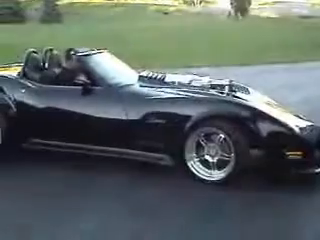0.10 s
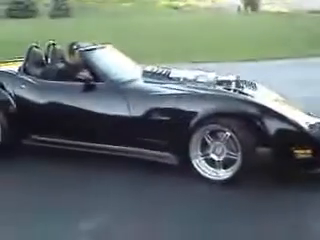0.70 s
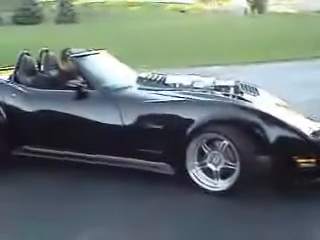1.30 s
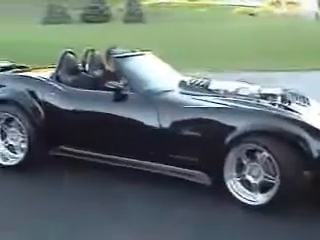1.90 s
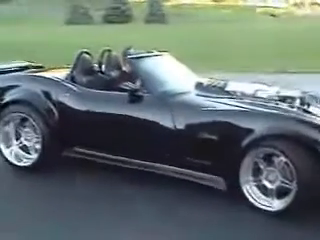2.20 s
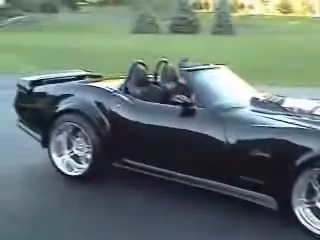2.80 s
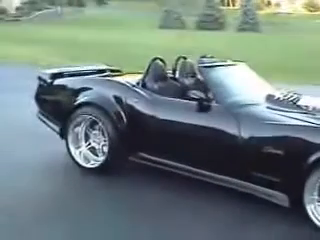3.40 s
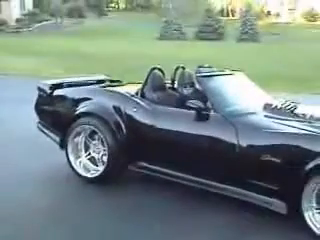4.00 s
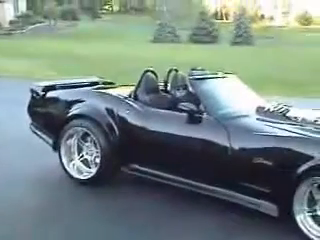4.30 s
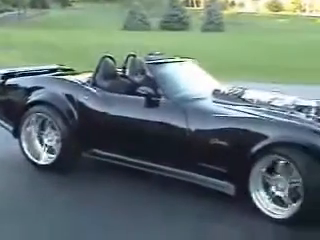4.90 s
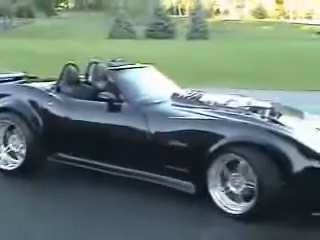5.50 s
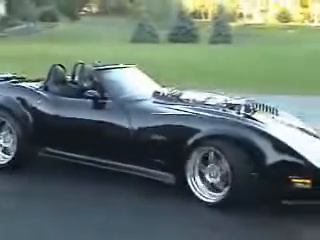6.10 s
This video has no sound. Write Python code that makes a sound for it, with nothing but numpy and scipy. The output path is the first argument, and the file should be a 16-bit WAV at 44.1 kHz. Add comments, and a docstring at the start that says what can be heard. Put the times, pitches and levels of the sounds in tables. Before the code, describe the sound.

A V8 sports car runs close to the microphone in the open air. For the first two seconds it idles with a deep, uneven boom and chuffing exhaust, over a light engine hiss, faint valve ticking and a couple of soft pops. Near 2 seconds the engine drags down slightly. Short revs follow: a strong one at about 2.3 seconds, two lighter ones around 3.4 and 3.8, a sharp one at 4.4, a double push from 4.9 to 5.3, and a last one from 5.8 to 6. With each, the pitch rises, the boom becomes a bark and the exhaust rasps hard, then crackles and stumbles as the speed falls. Pops and misfires come between, the loudest near 4.5 and 5.25 seconds. The intake gives a few very brief, high whistles. Light wind rumbles on the microphone underneath throughout.

```python
"""A V8 sports car idles: uneven firings boom in its side pipes, and each one spits a puff of gas.
The open engine hisses and ticks, and a little wind rumbles on the microphone.
Near two seconds the clutch takes up and drags the engine down. Eight short presses of the pedal
follow: the boom gives way to a bark, the gas turns to a hard rasp, the pipes pop and misfire,
and air whistles briefly through the throttle."""
import sys
import numpy as np
from scipy import signal
from scipy.fft import rfft, irfft, next_fast_len
from scipy.io import wavfile
from scipy.ndimage import uniform_filter1d, map_coordinates

SR = 44100
rng = np.random.default_rng(int(sys.argv[2]) if len(sys.argv) > 2 else 0)


def output_pcm(signal):
    """Save a mono or channel-first signal as 16-bit PCM at the path in sys.argv[1].

    Samples are clipped to [-1, 1] before scaling.
    """
    pcm = np.clip(np.atleast_2d(signal).T, -1, 1) * 32767
    wavfile.write(sys.argv[1], SR, np.round(pcm).astype(np.int16))


N = 274743


def amp(db):
    """Turn decibels into a gain."""
    return 10 ** (np.asarray(db) / 20)


def unit(x):
    """Scale x to an average (rms) level of 1."""
    return x / np.sqrt(np.mean(x ** 2) + 1e-20)


def wobble(rate):
    """A smooth random curve through rate points a second."""
    return map_coordinates(rng.standard_normal(int(N * rate / SR) + 4), [np.arange(N) * rate / SR])


def flutter(rate):
    """A random zigzag through rate points a second."""
    knots = rng.standard_normal(int(N * rate / SR) + 2)
    return np.interp(np.arange(N) * rate / SR, np.arange(len(knots)), knots)


def swell(s, half):
    """A smooth bump of height 1 at time s, lasting about half seconds to each side."""
    out = np.zeros(N)
    near = np.arange(max(int((s - 4 * half) * SR), 0), min(int((s + 4 * half) * SR), N))
    out[near] = np.exp(-((near / SR - s) / half) ** 2)
    return out


def step(s, ease):
    """A smooth rise from 0 to 1 around time s."""
    return .5 + .5 * np.tanh((np.arange(N) / SR - s) / ease)


def lagged(x, seconds):
    """Follow x sluggishly, about this many seconds behind."""
    share = 1 / (seconds * SR)
    return signal.lfilter([share], [1, share - 1], x)


def filtered(x, response):
    """Scale each frequency in x by the gain response(hz)."""
    size = next_fast_len(N + SR // 2)
    return irfft(rfft(x, size) * response(np.fft.rfftfreq(size, 1 / SR)), size)[:N]


def ring(x, spectrum):
    """Let x ring in a body whose tone is given as (Hz, dB) points."""
    size = 16384
    hz, db = np.transpose(spectrum)
    curve_db = np.interp(np.log(np.fft.rfftfreq(size, 1 / SR) + 1), np.log(hz + 1), db)
    cepstrum = irfft(np.log(amp(curve_db)))
    # fold it so that the ringing comes after each hit, never before
    cepstrum[1:size // 2] *= 2
    cepstrum[size // 2 + 1:] = 0
    return signal.fftconvolve(x, irfft(np.exp(rfft(cepstrum))))[:N]


def steady(x, span, swing=0):
    """Even out the level of x over span seconds, keeping the share swing of its changes in dB."""
    size = int(span * SR)
    power = np.abs(uniform_filter1d(uniform_filter1d(unit(x) ** 2, size), size)) + 1e-12
    return unit(x) / power ** ((1 - swing) / 2)


def effort(engine, idle_db, throttle_db, doubling_db):
    """A level in dB: idle_db, plus throttle_db at full throttle and doubling_db per doubling of speed."""
    return idle_db + throttle_db * engine["throttle"] + doubling_db * np.log2(engine["speed"] / IDLE_HZ)


# The tone of the wind. Each row: frequency in Hz, level in dB.
WIND_TONE = [(8, -9), (20, -8), (45, -6.5), (70, -2.5), (150, -21), (400, -83)]
# Gusts. Each row: time in seconds, dB above the breeze.
GUSTS = [(1.79, 13), (3.43, 8), (4.48, 6), (4.96, 4), (6.13, 4)]

def wind():
    """Light wind rumbles on the microphone, with a few gusts."""
    level_db = -35 + 2 * wobble(6) + sum(db * swell(s, half=.04) for s, db in GUSTS)
    return amp(level_db) * steady(ring(rng.standard_normal(N), WIND_TONE), span=.15)


# Brief whistles. Each row: time in seconds, pitch in Hz, level in dB, half length in seconds.
WHISTLES = [(2.977, 8120, -46, 0.033), (3.433, 7100, -33, 0.0045), (4.46, 7520, -27, 0.0041),
            (5.334, 4530, -32.5, .0046), (5.68, 8850, -45.5, 0.0074)]

def whistles():
    """Air whistles for a moment through the narrow throttle gap."""
    out = np.zeros(N)
    for s, hz, db, half in WHISTLES:
        band = unit(filtered(rng.standard_normal(N), lambda f: 1 / (1 + ((f - hz) / 300) ** 2)))
        out += amp(db) * swell(s, half) * band
    return out


# Loose valve lifters. Each row: place in the engine cycle from 0 to 1, relative level in dB.
LIFTERS = [(0.048, 0.5), (.37, -4), (.54, -6.5), (0.708, -2)]
# The tone of a tick. Each row: frequency in Hz, level in dB.
TICK_TONE = [(1500, -15), (3200, 2.5), (5000, -2), (7000, 0.5), (10000, -6), (11200, -15), (12000, -30)]
TICK_DB, TICK_SCATTER_DB, TICK_DECAY_S = -53.5, 2.5, 0.0033

def lifters(engine, turns):
    """Each loose lifter, a part that pushes a valve open, ticks once a cycle."""
    knocks = np.zeros(N)
    for place, db in LIFTERS:
        cycle = turns + 1 - place
        size_db = db + TICK_SCATTER_DB * rng.standard_normal(256)[cycle.astype(int)]
        since_tick_s = (cycle % 1) / engine["speed"]
        knocks += amp(size_db) * np.exp(-since_tick_s / TICK_DECAY_S)
    return amp(TICK_DB) * unit(ring(knocks * rng.standard_normal(N), TICK_TONE))


# Pops in the pipe. Each row: start in seconds, thud in dB, crack in dB before its tone is shaped.
POPS = [(.832, -25, -26), (1.263, -21, -28), (2.348, -20, -21), (2.359, -26, -17), (3.58, -18, -24),
        (4.21, -17, -27), (4.443, -10, -31), (4.515, -7, -22), (5.052, -21, -24), (5.251, -7, -18),
        (5.263, -7, -23)]
THUD_HZ, THUD_S, CRACK_S = 210, 0.05, .011  # the times are for a fade of 60 dB

def pops():
    """An overfull cylinder gives one low thud with a short crack."""
    thuds, cracks = np.zeros((2, N + SR))
    t = np.arange(SR // 10) / SR
    for s, thud_db, crack_db in POPS:
        at = round(s * SR)
        thuds[at:at + len(t)] += amp(thud_db - 60 * t / THUD_S) * np.sin(2 * np.pi * THUD_HZ * t)
        cracks[at:at + len(t)] += amp(crack_db - 60 * t / CRACK_S) * rng.standard_normal(len(t))
    crack_tone = [(200, 21), (800, 2.5), (2200, 13.5), (3200, -0.5), (7500, -12), (12000, -35)]
    return thuds[:N] + ring(cracks[:N], crack_tone)


def swirl(stumble, patchy_db):
    """Noise whose tone shifts from moment to moment, more so while the engine stumbles."""
    _, times, spectra = signal.stft(rng.standard_normal(N), SR, nperseg=512)
    patches = uniform_filter1d(rng.standard_normal(spectra.shape), size=5, axis=0)
    patches = uniform_filter1d(patches, size=9, axis=1)
    depth_db = patchy_db * np.sqrt(np.interp(times, np.arange(N) / SR, stumble))
    return signal.istft(spectra * amp(depth_db * unit(patches)), nperseg=512)[1][:N]


# How strong each cylinder's puff is, in firing order. pattern_db turns these numbers into dB.
CYLINDERS = [5, 4, -6, 0.5, -0.5, 3.5, 2.5, 0.5]
# Which of a cycle's eight firings, counted from 0, come from the near bank (row) of cylinders.
NEAR_BANK = [0, 1, 3, 6]

def puffs(stumble, turns, surplus, tone, decay, punch, scatter_db, patchy_db,
          pattern_db=0, lope_db=0, bank_db=0):
    """Rushing gas swells at each firing and dies down; decay is a share of the gap between firings."""
    firing, stroke = (8 * turns).astype(int), 8 * turns % 1
    # part of a puff's size follows the firing, part is its own
    chance = np.tanh(0.55 * surplus + 1.95 * rng.standard_normal(len(surplus)))[firing]
    size_db = pattern_db * np.take(CYLINDERS, firing % 8) + scatter_db * np.sqrt(stumble) * chance
    size_db -= lope_db * np.cos(2 * np.pi * turns)  # the flow heaves once a cycle
    size_db += bank_db * np.isin(firing % 8, NEAR_BANK)  # the near pipe is louder
    pulse = (stroke / decay * np.exp(1 - stroke / decay)) ** 2
    flow = amp(size_db) * (1 + punch * pulse) * swirl(stumble, patchy_db)
    return steady(ring(flow, tone), span=0.058)


# The tones of the low chuff, the soft rasp, its hard bite under throttle, and the intake hiss.
# Each row: frequency in Hz, level in dB.
CHUFF_TONE = [(200, -25.5), (340, 3.5), (480, -0.5), (600, -0.5), (740, 0.5), (790, 3), (845, -0.5),
              (1000, -2.5), (1300, -6.5), (1700, -8.5), (2200, -24.5), (3000, -51)]
RASP_TONE = [(600, -43), (1100, 0), (1500, -5), (1900, 4.5), (2250, 0), (2600, -8), (3300, -9.5),
             (5000, -16), (9000, -42)]
BITE_TONE = [(500, -39), (950, -14), (1400, 3), (1850, 5.5), (2100, 5.5), (2350, 5), (2650, -2),
             (3300, -14.5), (5500, -6), (9000, -38)]
HISS_TONE = [(1500, -19.5), (2800, 2), (3800, 1), (5200, -2.5), (6300, 0), (7400, -1), (8300, -6),
             (9800, -11.5), (11000, -25), (12000, -57)]
# Bursts of harder rasp. Each row: time in seconds, half length in seconds, boost in dB.
SPITS = [(2.342, 0.0061, 6), (3.537, 0.046, 2.5), (3.964, 0.029, 9), (4.604, 0.035, 7.5),
         (5.15, 0.041, 4.5), (5.998, 0.026, 4.5)]
AFTERBURN_DB, AFTERBURN_S = 10.5, 0.16  # the gas keeps crackling after the pedal lifts
GULP_DB, GULP_S = 7.5, 0.047  # the intake gulps when the throttle snaps open

def gas(engine, turns, surplus):
    """Puffs of exhaust gas chuff and rasp, while the intake of the open engine hisses."""
    throttle, stumble = engine["throttle"], engine["stumble"]
    chuff_db = effort(engine, idle_db=-33.5, throttle_db=1, doubling_db=5.5) + engine["chuff_trim"]
    rasp_db = effort(engine, idle_db=-46, throttle_db=6.5, doubling_db=8.5) + engine["rasp_trim"]
    rasp_db += AFTERBURN_DB * lagged(throttle, AFTERBURN_S)
    rasp_db += sum(db * swell(s, half) for s, half, db in SPITS)
    hiss_db = effort(engine, idle_db=-45, throttle_db=12.5, doubling_db=6.5) + engine["hiss_trim"]
    hiss_db += GULP_DB * (throttle - lagged(throttle, GULP_S))
    firings = stumble, turns, surplus
    chuff = puffs(*firings, CHUFF_TONE, decay=.18, punch=.57, scatter_db=3, patchy_db=2.5,
                  pattern_db=.46, lope_db=2)
    rasp = puffs(*firings, RASP_TONE, decay=.36, punch=.5, scatter_db=6, patchy_db=4,
                 pattern_db=-.15, lope_db=.8)
    hiss = puffs(*firings, HISS_TONE, decay=.24, punch=.67, scatter_db=3, patchy_db=4.5,
                 lope_db=2, bank_db=1)
    bite = puffs(*firings, BITE_TONE, decay=.4, punch=2, scatter_db=2.5, patchy_db=2.5, bank_db=4)
    # the harder the pipes blow, the more the soft rasp turns into separate cracks
    hard = np.clip((rasp_db + 42.5) / 10, 0, 1)
    spit = np.sqrt(1 - hard) * rasp + np.sqrt(hard) * bite
    # some cycles burn better than others, so the gas comes in lumps; a misfire blows less
    lump_db = 1.53 * np.sqrt(stumble) * wobble(36)
    lump_db += sum(db * swell(s, 2 * half) for s, half, _, _, db in MISFIRES)
    exhaust = amp(lump_db) * (amp(chuff_db) * chuff + amp(rasp_db) * spit)
    return exhaust + amp(hiss_db + .5 * lump_db + .48 * wobble(40)) * hiss


def bank_phase(multiple, far_share=0.88, skew=0.0971):
    """The phase of one engine tone: the two banks' pipes differ in length, putting them skew cycles apart."""
    beats = np.exp(-2j * np.pi * multiple * np.arange(8) / 8)
    near = beats[NEAR_BANK].sum()
    far = beats.sum() - near
    return np.angle(near + far_share * far * np.exp(2j * np.pi * multiple * skew))


# The tones in the engine's beat. Each row: multiple of the cycle rate, dB at idle, dB when revved.
ENGINE_TONES = [(3, -8, -10), (4, -13, -17), (5, 1, 4), (6, -8, -9), (7, -12, -10), (8, 0, -2), (9, -8, -7),
                (10, -13, -5), (11, -3, -7), (12, -16, -12), (13, -5, -2), (14, -12, -11), (15, -9, -8),
                (16, -3, -5), (17, -13, -12), (18, -16, -9), (19, -5, -10), (20, -10, -11), (21, -13, -11),
                (22, -10, -12), (24, -9, -10), (25, -10, -14), (26, -10, -14), (27, -10, -12)]
# One tone booms for a moment as it meets a pipe resonance.
# Each row: time in seconds, multiple of the cycle rate, boost in dB, half length in seconds.
DRONES = [(1.987, 8, 3, 0.043), (2.25, 13, 9.5, 0.046), (2.404, 13, 7, 0.065), (3.034, 10, 14.5, 0.13),
          (3.59, 10, 3.5, 0.057), (3.822, 10, 10.5, 0.025), (4.617, 8, 14.5, 0.016), (5.104, 8, 4.5, 0.049),
          (5.277, 8, 13, 0.031), (6.023, 8, 11, 0.042)]
BURBLE_DB = 3  # how far each tone wanders in level when revved

def firing_beat(turns, revved):
    """The uneven beat of the two banks, built as a stack of tones that follow the engine's speed."""
    beat = np.zeros(N)
    for multiple, idle_db, rev_db in ENGINE_TONES:
        drone_db = sum(db * swell(s, half) for s, which, db, half in DRONES if which == multiple)
        level_db = idle_db + revved * (rev_db - idle_db + BURBLE_DB * flutter(rate=17)) + drone_db
        beat += amp(level_db) * np.cos(2 * np.pi * multiple * turns + bank_phase(multiple))
    return beat


def kicks(turns, surplus):
    """Each firing is a little too strong or too weak, and comes a little early or late."""
    firings = np.flatnonzero(np.diff(np.floor(8 * turns)))
    gaps = np.gradient(firings)
    late = (gaps * rng.uniform(-0.17, 0.23, len(firings))).astype(int)
    out = np.zeros(N)
    out[np.clip(firings + late, 0, N - 1)] = surplus[:len(firings)] * gaps
    return out


# The side pipe's tone, with peaks where it rings. Each row: frequency in Hz, level in dB.
PIPE_TONE = [(35, -45.5), (60, -24.5), (74, -10), (88, 2.5), (103, 7.5), (119, 0), (140, -8), (166, -1.5),
             (200, -7.5), (243, -13), (284, -6), (320, -14.5), (420, -23), (600, -30.5)]
# Misfires, where the pipes fall quiet for a few firings. Each row: time in seconds,
# half length in seconds (doubled for the gas), then the change in dB of boom, bark and gas.
MISFIRES = [(1.794, 0.022, -4, -3, 0), (2.081, 0.023, -14, -3.5, 0), (3.086, 0.038, -20, -6, -3),
            (3.228, 0.026, -26, -8, -0.5), (3.732, 0.027, -8, 0, -1.5), (5.652, 0.05, -1, -7, -3.5)]
# The bark dips while the engine runs slack. Each row: time in seconds, half length in seconds, dB.
LULLS = [(2.064, 0.15, -4.5), (2.765, 0.054, -8), (2.885, 0.056, -9), (4.157, 0.023, -10),
         (5.485, 0.087, -3.5), (6.18, 0.05, -1)]
LOPE_DB, LOPE_AT = 1.5, 0.68  # at idle the bark throbs, peaking this far through each cycle

def pipes(engine, turns, surplus):
    """The firings ring the side pipes: a deep boom gives way to a higher bark as the throttle opens."""
    revved = np.clip((engine["speed"] - 15) / 1.5, 0, 1)
    pulses = firing_beat(turns, revved) + .68 * engine["stumble"] * kicks(turns, surplus)
    sound = ring(pulses, PIPE_TONE)
    low = lambda hz: 1 / (1 + (hz / 138) ** 10)
    middle = lambda hz: (1 - low(hz)) / (1 + (hz / 600) ** 4)
    boom = steady(filtered(sound, low), span=0.17, swing=0.37)
    bark = steady(filtered(sound, middle), span=0.14, swing=0.33)
    boom_db = effort(engine, idle_db=-17, throttle_db=-3, doubling_db=-6) + engine["boom_trim"]
    boom_db += sum(db * swell(s, half) for s, half, db, _, _ in MISFIRES)
    bark_db = effort(engine, idle_db=-19.5, throttle_db=4.5, doubling_db=-2)
    bark_db += sum(db * swell(s, half) for s, half, _, db, _ in MISFIRES)
    bark_db += sum(db * swell(s, half) for s, half, db in LULLS)
    bark_db += LOPE_DB * (1 - revved) * np.cos(2 * np.pi * (turns - LOPE_AT))
    return amp(boom_db) * boom + amp(bark_db) * bark


# Presses of the pedal. Each row: start in seconds, end in seconds, throttle from 0 to 1,
# added stumble, then the change in dB of boom, chuff, rasp and hiss.
PRESSES = [(2.227, 2.443, .69, 0.83, -2.5, 6, 3, 2.5), (2.502, 3.003, .06, 0.03, 1, -0.5, 1, -1.5),
           (3.38, 3.627, 0.38, 0.74, -1, 1, 1, 2.5), (3.776, 4.023, .365, .1, 4, 0.5, -8.5, -3),
           (4.406, 4.608, .71, 1, -2, 1, -1, -.5), (4.884, 5.114, .35, 0.19, 4.5, 2, 0, -3.5),
           (5.105, 5.273, 0.67, 0.4, -3, 0, 0.5, -2), (5.774, 6.046, 0.62, 1, -6, 1.5, 1.5, -2)]
OPEN_S, SHUT_S, FLYWHEEL_S, CLUTCH_AT_S = .057, .085, .37, 1.935
# Engine cycles a second, eight firings each: at idle, added by full throttle, taken by the clutch.
IDLE_HZ, PULL_HZ, CLUTCH_DRAG_HZ = 14.75, 50, 4.42

def drive():
    """The pedal pulls the heavy flywheel up to speed against the drag of the clutch."""
    held = np.array([step(start, OPEN_S) * (1 - step(end, SHUT_S)) for start, end, *_ in PRESSES])
    throttle, rough, boom_trim, chuff_trim, rasp_trim, hiss_trim = np.array(PRESSES)[:, 2:].T @ held
    clutch = step(CLUTCH_AT_S, OPEN_S)
    speed = IDLE_HZ + lagged(PULL_HZ * throttle - CLUTCH_DRAG_HZ * clutch, FLYWHEEL_S)
    just_lifted = np.maximum(lagged(throttle, seconds=.2) - throttle, 0)
    misfiring = sum(swell(s, 2 * half) for s, half, *_ in MISFIRES)
    # stumble is how unequal one firing is to the next
    stumble = np.abs(.17 + .063 * clutch + .37 * misfiring + .6 * just_lifted + rough)
    return dict(throttle=throttle, speed=speed, stumble=stumble,
                boom_trim=boom_trim, chuff_trim=chuff_trim, rasp_trim=rasp_trim, hiss_trim=hiss_trim)


def crank(engine):
    """Unequal firings jerk the crankshaft. Gives cycles turned and each firing's random extra push."""
    turns = np.cumsum(engine["speed"] * (1 + 0.027 * engine["stumble"] * wobble(45))) / SR
    return turns, rng.standard_normal(2048)


def scene():
    """The car close by, in the open."""
    engine = drive()
    turns, surplus = crank(engine)
    exhaust = pipes(engine, turns, surplus) + gas(engine, turns, surplus) + pops()
    return (exhaust + lifters(engine, turns) + whistles() + wind())[None]


def record(dry):
    """Cut away the very highest treble."""
    return filtered(dry[0], lambda hz: hz < 12160)[None]


dry = scene()
out = record(dry)
output_pcm(out)
```